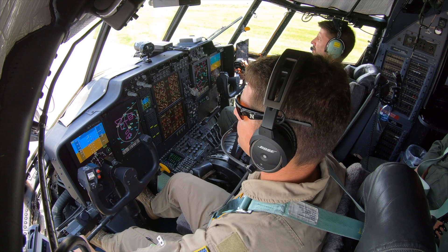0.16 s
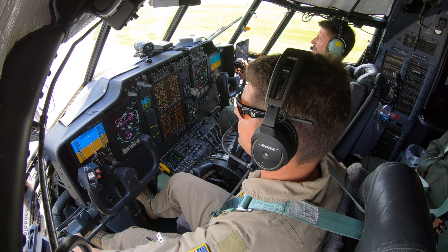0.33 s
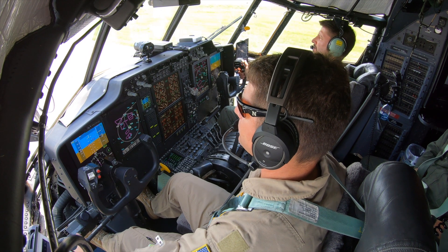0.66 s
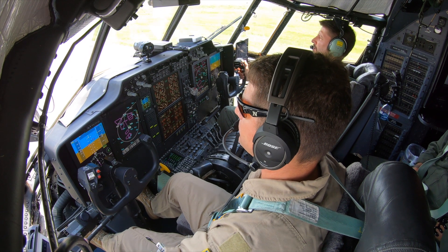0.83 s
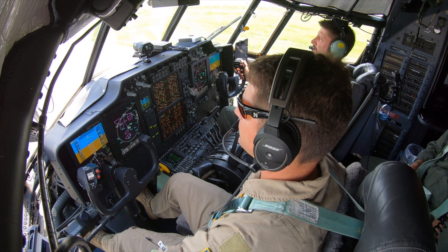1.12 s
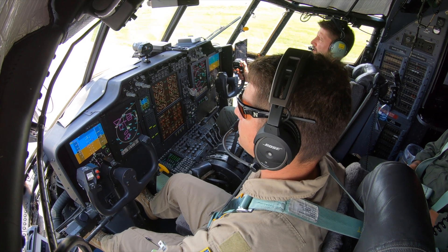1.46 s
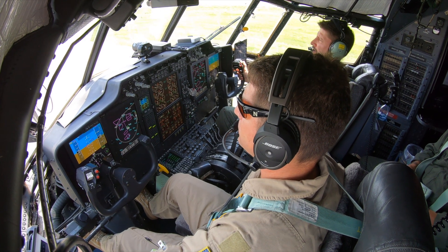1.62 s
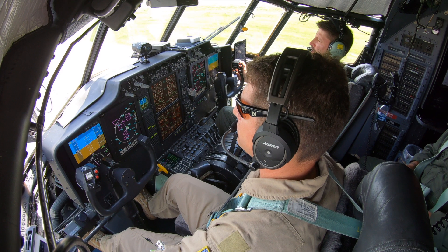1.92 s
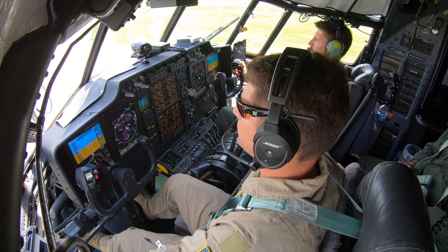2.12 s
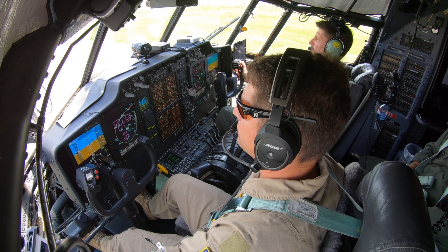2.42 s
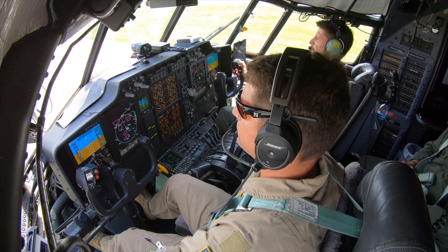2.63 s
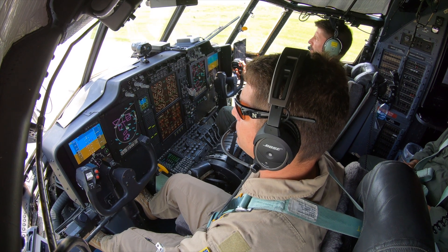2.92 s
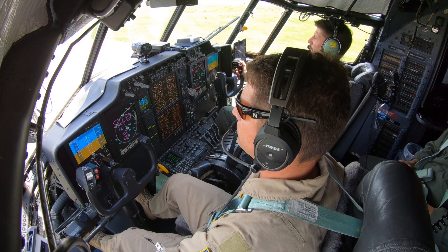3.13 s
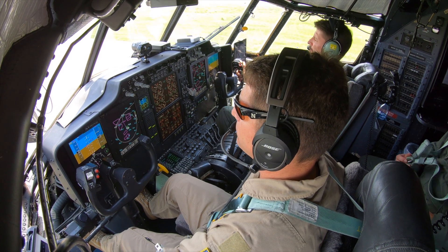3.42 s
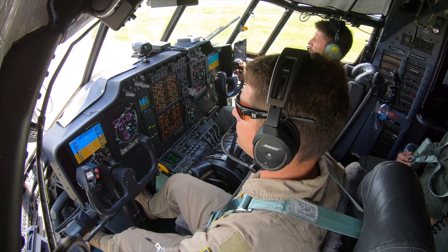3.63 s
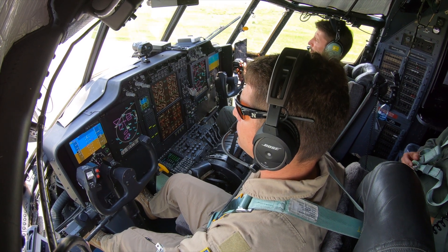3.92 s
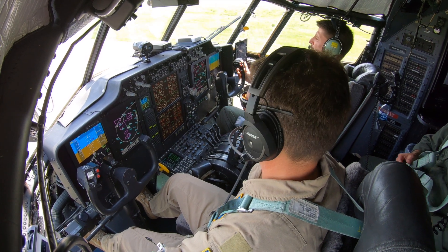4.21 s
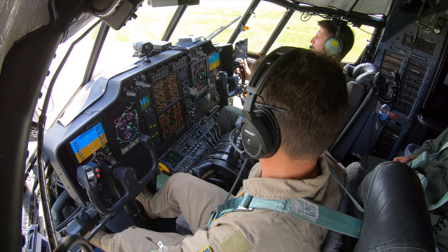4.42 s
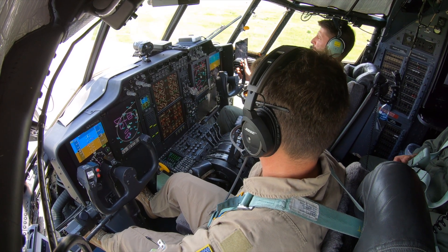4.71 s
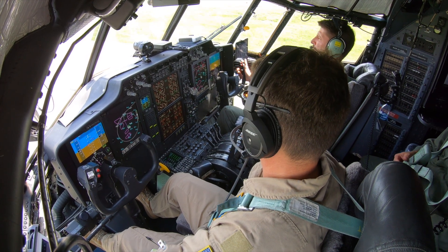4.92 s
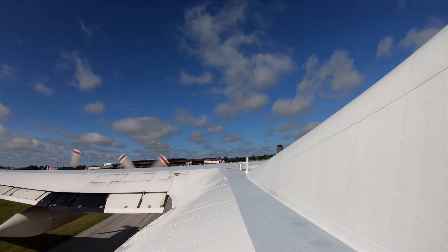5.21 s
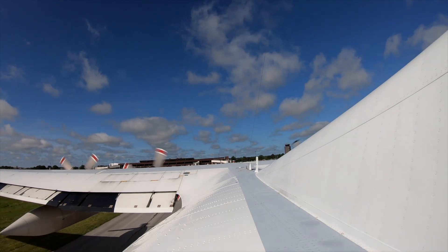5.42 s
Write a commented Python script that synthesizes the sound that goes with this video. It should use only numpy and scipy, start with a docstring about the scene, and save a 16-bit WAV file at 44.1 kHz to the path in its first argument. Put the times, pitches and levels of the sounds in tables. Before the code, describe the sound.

A continuous loud cockpit drone: two propeller hums beating slowly against each other, dense low rumble with uneven flutter, ventilation-like hiss and several thin wavering whines, the highest leaning right. The low end is nearly mono, the hiss wider. In the last fraction of a second, a hard cut moves outdoors to broad windy propeller wash with little whine.

```python
"""Turboprop engines idle on the ground, heard in the cockpit: two propeller hums of drifting phase beat
slowly, and delayed copies of turbulent noise add up to a ribbed roar. Smooth noise makes the air hiss and
wavering harmonic series make the gear whine; loud peaks duck all of them.
At 5.25 s, near the end, the listening point jumps outside, above the wing, to a thinner and wider rush of
air: ribbed noise and faint low hums."""
import sys
import numpy as np
from scipy import signal
from scipy.fft import rfft, irfft
from scipy.io import wavfile

SR = 44100
rng = np.random.default_rng(int(sys.argv[2]) if len(sys.argv) > 2 else 0)


def store_pcm(level_fs):
    """Save levels as 16-bit WAV."""
    pcm = np.round(np.clip(level_fs, -1, 1) * 32767).astype(np.int16)
    wavfile.write(sys.argv[1], SR, np.atleast_2d(pcm).T)


N = 244755
TIME = np.arange(N) / SR  # s
HZ = np.maximum(np.arange(N // 2 + 1) * SR / N, 1)  # frequency of each spectral bin, kept above zero

# Phase slip of the farther propeller behind the nearer; the hums oppose at .5, 1.5, 2.5 turns.
# Columns: time_s, slip_turns
PROPELLER_SLIP = [(0, .24), (.3, .28), (.45, .23), (.55, .34), (.65, .5), (.75, .7), (.85, .62), (.92, .7),
                  (1.02, .68), (1.3, .95), (1.45, 1.17), (1.85, 1.23), (2.15, 1.5), (2.21, 1.34),
                  (2.3, 1.3), (2.4, 1.45), (2.56, 1.5), (2.75, 1.9), (2.9, 1.61), (3.05, 1.9), (3.25, 1.7),
                  (3.4, 1.97), (3.52, 2.27), (3.65, 2.18), (4.0, 2.29), (4.2, 2.29), (4.3, 2.47),
                  (4.45, 2.65), (4.53, 2.57), (4.85, 2.74), (5.05, 2.73), (5.17, 2.93)]
# Multiples of the blade rate that sound as tones, from the second up. Column: pitch_hz
RIB_TONE_HZ = [126.5, 187.4, 253.3, 317.3, 382, 443, 505]
# One row for each of those pitches; the rise applies where the hums oppose, its reverse where they agree.
# Columns: base_level_db, blur_hz, rise_db
RIB_TONE_LEVELS = [(-29.5, 6.4, 7), (-26, 3.84, 3), (-27.5, 6, 0.5), (-26.5, 5.13, 1), (-38, 4.5, -0.5),
                   (-40.5, 6.1, -7.5), (-38, 4.4, -1)]
# Strongest surges of the rib tones. Columns: centre_s, blade_rate_multiple, rise_db
RIB_SURGES = [(.3, 3, 4), (.62, 2, 5), (.7, 5, 3), (.81, 4, 6), (.88, 2, 5), (1.1, 5, 3), (1.42, 4, 6),
              (1.56, 5, 3), (2.1, 2, 4), (2.17, 4, 5), (2.25, 8, 7), (2.43, 5, 6), (2.65, 3, 6),
              (2.73, 7, 8), (2.9, 3, 5), (3.18, 3, 4), (3.2, 5, 5), (3.38, 7, 7), (3.55, 8, 8),
              (3.57, 4, 4), (3.85, 4, 4), (3.85, 5, 4), (3.92, 3, 5), (3.95, 6, 5), (4.18, 2, 4),
              (4.23, 7, 5), (4.27, 4, 4), (4.38, 2, 4), (4.41, 5, 4), (4.5, 3, 5), (4.7, 5, 4),
              (4.97, 4, 5), (5.02, 2, 4), (5.09, 7, 5), (5.09, 8, 7), (5.1, 3, 4), (5.21, 5, 6)]
HUM_HZ = 65.2  # midway between the two propellers' blade-passing hums
NEAR_DB, FAR_DB = -18.5, -20.5
HUM_WAVER_DB, HUM_WAVER_RADIANS = .6, .15
SURGE_S = .066  # half length of a surge


def blade_tones():
    """Beating: two hums of drifting phase add and oppose, and unsteady inflow modulates their multiples."""
    turn = rng.uniform(0, 2 * np.pi) + 2 * np.pi * HUM_HZ * TIME
    slip = 2 * np.pi * np.interp(TIME, *np.transpose(PROPELLER_SLIP))
    behind = slip + HUM_WAVER_RADIANS * drift(4.3)
    near = from_db(NEAR_DB + HUM_WAVER_DB * drift(6.3)) * np.sin(turn + behind / 2)
    far = from_db(FAR_DB + HUM_WAVER_DB * drift(3.9)) * np.sin(turn - behind / 2)
    tones = np.sqrt(2) * (near + far)
    rows = zip(RIB_TONE_HZ, RIB_TONE_LEVELS)
    for multiple, (pitch_hz, (level_db, blur_hz, rise_db)) in enumerate(rows, 2):
        surge_db = 0
        for centre_s, surging_multiple, peak_db in RIB_SURGES:
            if surging_multiple == multiple:
                surge_db = surge_db + peak_db * np.exp(-.5 * ((TIME - centre_s) / SURGE_S) ** 2)
        gain = from_db(level_db + surge_db - rise_db * np.cos(behind))
        tones = tones + gain * lumpy_tone(pitch_hz, blur_hz)
    return tones


# Spectrum of the roar before its ribs and the cabin colour it; only the shape counts.
# Columns: frequency_hz, relative_density_db
ROAR_SPECTRUM = [(18, -14), (28, -7), (38, -13), (50, -4), (65, -11.5), (88, -6), (100, -3.5), (145, -4.5),
                 (215, -2.5), (280, -2), (335, -3), (370, -8), (450, -6), (600, -18), (1100, -31),
                 (5000, -103)]
ROAR_DB, ROAR_RIB_SHARE = -15, .24


def propeller_roar():
    """Repeated chopping: eddies cut by blade after blade give a ribbed roar through the cockpit walls."""
    colour = blade_ribs(ROAR_RIB_SHARE) * from_db(over_hz(ROAR_SPECTRUM))
    return from_db(ROAR_DB) * cabin_noise(colour)


# Spectrum of the hiss before the cabin colours it; only the shape counts.
# Columns: frequency_hz, relative_density_db
HISS_SPECTRUM = [(500, -20), (900, 4.5), (1400, -1.5), (2000, -4.5), (3200, -7), (4600, -8), (6000, -8.5),
                 (7200, -6), (8300, -13.5), (10200, -14.5), (11800, -22.5), (13800, -29.5), (15000, -40),
                 (15300, -52)]
HISS_DB = -31.5


def air_hiss():
    """Broadband flow noise: intake and ventilation air hisses smoothly and flutters a little."""
    flutter_db = .5 * drift(2.7) + .5 * drift(35.0)
    return from_db(HISS_DB + flutter_db) * cabin_noise(from_db(over_hz(HISS_SPECTRUM)))


# Fundamental of each gear mesh. Column: pitch_hz
MESH_HZ = [1614.8, 1663.45, 1686.0, 1368.9, 1386.1, 7553.0, 7267.0, 5394.0, 13885.0]
# One row for each mesh; pitch waver is that of the fundamental.
# Columns: pitch_waver_hz, level_waver_db, list of (multiple, left_level_db, right_level_db)
GEAR_MESHES = [(.2, 2.5, [(1, -54, -59), (2, -57, -56), (3, -58, -55), (4, -55, -51), (5, -64, -64),
               (6, -76, -66), (8, -78, -77)]), (.2, 1.5, [(2, -66, -64), (3, -53, -54), (4, -60, -40),
               (5, -72, -73), (6, -74, -67), (7, -83, -74)]), (.2, 1.5, [(1, -58, -53), (2, -55, -56),
               (3, -53, -54), (4, -61, -48), (5, -61, -54), (6, -70, -60), (7, -84, -75)]),
               (1.4, 1.8, [(1, -42.5, -41.5), (2, -58, -57)]), (1.0, 2.0, [(1, -45, -48), (2, -58, -63),
               (4, -61, -55)]), (4.0, 2.5, [(1, -55, -43.5)]), (3.0, 3.0, [(1, -73, -55)]),
               (3.0, 3.0, [(1, -62, -60)]), (2.0, 3.0, [(1, -86, -77)])]
# The strongest gear tones. Column: pitch_hz
WHINE_HZ = [1369, 1386, 4844, 5058, 6459, 6654, 6744, 7553]
# Their slow swells; only the swing about the mean counts.
# Columns: time_s, then level_db for each of those pitches
WHINE_SWELLS = [(.3, -41.5, -48.5, -59.5, -58.5, -49.5, -45.5, -53, -52),
                (.9, -43, -46.5, -57, -58, -53, -45.5, -52.5, -60),
                (1.5, -43.5, -48.5, -56, -55, -53, -45, -56.5, -54.5),
                (2.1, -44, -49, -53.5, -52.5, -56, -45, -56.5, -50.5),
                (2.7, -47, -48.5, -56, -51, -56.5, -47, -55.5, -47.5),
                (3.3, -43.5, -47, -57.5, -53.5, -56, -46.5, -55, -51),
                (3.9, -43, -47, -60, -53, -55.5, -47.5, -53.5, -57),
                (4.5, -42.5, -46, -57.5, -54, -59.5, -47, -52, -65),
                (5.0, -42, -48, -58, -53, -57, -46, -55, -60)]


def gear_whine():
    """Harmonic series: each mesh sings on multiples of one wavering rate, and the strongest swell slowly."""
    whine, lead = np.zeros((2, N)), over_hz(CABIN_LEAD)
    swell_times, *swell_levels = np.transpose(WHINE_SWELLS)
    for mesh_hz, (pitch_waver_hz, level_waver_db, multiples) in zip(MESH_HZ, GEAR_MESHES):
        turn = 2 * np.pi * np.cumsum(mesh_hz + pitch_waver_hz * drift(3.56)) / SR
        for multiple, *sides_db in multiples:
            tone_hz = multiple * mesh_hz
            right_lag = np.c_[[0, lead[int(tone_hz * N / SR)]]]
            phase = multiple * turn + rng.uniform(0, 2 * np.pi) - right_lag
            swell_db = .5 * level_waver_db * drift(.54)
            for strong_hz, levels_db in zip(WHINE_HZ, swell_levels):
                if abs(strong_hz - tone_hz) < 2:
                    swell = from_db(np.interp(TIME, swell_times, levels_db))
                    swell_db = 20 * np.log10(rms_one(swell))
            level_db = np.c_[sides_db] + swell_db + .7 * level_waver_db * drift(11.0)
            whine += np.sqrt(2) * from_db(level_db) * np.sin(phase)
    return whine


# Spectrum of the outside wash before its ribs; only the shape counts.
# Columns: frequency_hz, relative_density_db
OUTSIDE_SPECTRUM = [(20, -1), (45, 6.5), (85, -3), (120, 1), (180, -4.5), (330, -6), (550, -7),
                    (1040, -12.5), (1500, -17.5), (2200, -23), (3700, -30.5), (5300, -31.5), (5900, -24.5),
                    (6700, -26), (7600, -30), (9000, -32.5), (11700, -42), (13500, -52), (15400, -68)]
# Part of the right channel not shared with the left, capped at 0 dB. Columns: frequency_hz, unshared_db
OUTSIDE_UNSHARED = [(60, 0.5), (180, 0.5), (550, -1.2), (1650, 1.5), (4000, -3), (9000, 4)]
# Stereo balance of the wash. Columns: frequency_hz, left_minus_right_db
OUTSIDE_BALANCE = [(60, 0), (700, 1.5), (1300, -7), (2400, -3.5), (4400, -3), (6200, -14.5), (7400, -12),
                   (8800, 0), (12000, -7)]
# Separate swells of the rumble and of the rush above it. Columns: time_s, rumble_db, rush_db
WASH_SWELLS = [(5.25, -2, -2), (5.35, -2, -2), (5.43, -2, -1.5), (5.5, -3.5, -2), (5.55, -6, -2)]
# Faint low hums of the propeller wash. Columns: pitch_hz, left_level_db, right_level_db
OUTSIDE_HUMS = [(53.2, -36, -33), (105, -36, -39), (129, -36, -35), (180, -35, -34), (240, -34.5, -38),
                (301, -39, -37)]
OUTSIDE_DB, OUTSIDE_RIB_SHARE = -18, .085
WASH_SPLIT_HZ = 600


def outside_rush():
    """Weakly coherent flow noise: wide wash above the wing, its rumble sinking below the rush."""
    colour = blade_ribs(OUTSIDE_RIB_SHARE) * from_db(over_hz(OUTSIDE_SPECTRUM))
    wash = stereo_noise(colour, OUTSIDE_UNSHARED, OUTSIDE_BALANCE, 0)
    rumble = irfft(rfft(wash) / (1 + (HZ / WASH_SPLIT_HZ) ** 2), N)
    rush = wash - rumble
    times, rumble_db, rush_db = np.transpose(WASH_SWELLS)
    rumble_gain = from_db(np.interp(TIME, times, rumble_db))
    rush_gain = from_db(np.interp(TIME, times, rush_db))
    flutter_db = .5 * drift(4.9) + .55 * drift(30.0)
    out = from_db(OUTSIDE_DB + flutter_db) * (rumble_gain * rumble + rush_gain * rush)
    for pitch_hz, *sides_db in OUTSIDE_HUMS:
        out = out + from_db(np.c_[sides_db]) * lumpy_tone(pitch_hz, 3.3)
    return out


RIB_HZ = 63.2  # rate at which blades cut the same eddy
RIB_BLUR_HZ = 900  # here the returning share has halved, so the ribs blur above


def blade_ribs(share):
    """Comb filtering: turbulence repeated at the blade rate piles up in broad ribs on its multiples."""
    share = np.clip(share, 0, .9) / (1 + (HZ / RIB_BLUR_HZ) ** 2)
    return np.sqrt(1 - share ** 2) / (1 - share * np.exp(-2j * np.pi * HZ / RIB_HZ))


RIB_STEADY = .62  # amplitude share of each tone that holds still


def lumpy_tone(hz, blur_hz):
    """Random modulation: part of a tone swells, dies and turns by chance; rms near 1."""
    unsteady = drift(blur_hz) + 1j * drift(blur_hz)
    lumps = RIB_STEADY + np.sqrt((1 - RIB_STEADY ** 2) / 2) * unsteady
    turn = 2 * np.pi * np.cumsum(hz + blur_hz / 2 * drift(blur_hz)) / SR
    return np.sqrt(2) * np.real(lumps * np.exp(1j * turn))


# Cabin and microphone-housing resonances; negative lifts are dips.
# Columns: frequency_hz, width_hz, left_lift_db, right_lift_db
CABIN_RESONANCES = [(148, 18, 4, 4), (168, 10, -2, -2), (212, 14, -2, -2), (340, 14, 2, 2), (545, 40, 2, 2),
                    (600, 30, 2, 2), (715, 50, -4, 0), (775, 70, 5, 3), (815, 50, 0, 3), (885, 80, 3, 0),
                    (990, 130, -3, 0), (1150, 30, 3, 3), (1223, 40, 7, 7), (1300, 110, 8, 5),
                    (1650, 70, 7, 7), (1900, 50, 2, 2), (2010, 80, 1, 2), (2234, 60, 3, 4),
                    (2360, 130, -2, -1), (2540, 110, -2, -2), (2740, 60, 3, 3), (2810, 60, -5, -4),
                    (2930, 130, 4, 3), (3110, 70, 3, 2), (3280, 70, -4, -4), (3650, 200, 3, 2),
                    (3900, 140, -3, -4), (4100, 200, 2, 1), (4350, 120, -2, -2), (5500, 350, 3, 3),
                    (5900, 400, -2, -2), (7350, 480, 4, 3)]
# Part of the right microphone's noise not shared with the left, capped at 0 dB.
# Columns: frequency_hz, unshared_db
CABIN_UNSHARED = [(30, -26), (60, -28), (120, -12.5), (270, -40), (450, -20), (600, -4.5), (800, -2),
                  (1220, -3), (2000, -0.5), (3300, -5), (5500, -0.5), (9000, 1)]
# Stereo balance apart from the resonances. Columns: frequency_hz, left_minus_right_db
CABIN_BALANCE = [(200, .2), (450, 1), (2000, -.5), (4500, -1), (5500, -4), (6000, -7), (6500, -12),
                 (7000, -13), (7600, -10), (8400, -4), (9500, -3), (10500, -6), (14000, -4)]
# Phase by which the left microphone leads. Columns: frequency_hz, left_lead_radians
CABIN_LEAD = [(200, 0), (780, -.5), (2760, -.3), (3360, .4), (5000, -.1), (6460, 1.0), (7410, 1.6)]


def cabin_noise(colour):
    """Resonance: the cabin lifts and dips bands of noise on its way to the two microphones."""
    lift_db = 0
    for hz, width_hz, *sides_db in CABIN_RESONANCES:
        hump = np.exp(-.5 * ((HZ - hz) / (width_hz / 2)) ** 2)
        lift_db = lift_db + np.outer(sides_db, hump)
    return stereo_noise(colour * from_db(lift_db), CABIN_UNSHARED, CABIN_BALANCE, over_hz(CABIN_LEAD))


def stereo_noise(colour, unshared, balance, lead):
    """Partial coherence: two coloured noises share a part at each frequency; joint rms 1."""
    shared, own = rfft(rng.standard_normal((2, N)))
    apart = from_db(np.minimum(over_hz(unshared), 0))
    tilt_db = over_hz(balance) / 2
    left = shared * from_db(tilt_db)
    lagging = np.sqrt(1 - apart ** 2) * shared * np.exp(-1j * lead)
    right = (lagging + apart * own) * from_db(-tilt_db)
    return rms_one(irfft(colour * np.array([left, right]), N))


LIMIT_DB, SQUEEZE = -6, .38  # ducking threshold, and dB of ducking for each dB above it
RELEASE_DB_PER_S, ATTACK_S = 90, .00031  # fall of the held peak, smoothing time of the ducking


def gain_control(x):
    """Dynamic compression: the cockpit microphone ducks both channels on loud peaks, recovering slowly."""
    peak_db = 20 * np.log10(np.abs(x).max(axis=0) + 1e-9)
    fall_db = RELEASE_DB_PER_S * TIME
    held_db = np.maximum.accumulate(peak_db + fall_db) - fall_db
    r = np.exp(-1 / (ATTACK_S * SR))
    duck_db = SQUEEZE * np.maximum(held_db - LIMIT_DB, 0)
    return x * from_db(-signal.lfilter([1 - r], [1, -r], duck_db))


def from_db(db):
    """Logarithmic level: decibels to amplitude gain."""
    return 10 ** (np.asarray(db) / 20)


def rms_one(x):
    """Normalisation: scale to unit rms."""
    return x / np.sqrt(np.mean(x ** 2) + 1e-20)


def over_hz(points):
    """Logarithmic pitch: a (frequency_hz, value) table read at every bin, straight on a log axis."""
    hz, value = np.transpose(points)
    return np.interp(np.log(HZ), np.log(hz), value)


def drift(rate_hz):
    """Low-passed chance: noise at every 40th sample through two equal one-pole filters; spread near 1."""
    r = np.exp(-80 * np.pi * rate_hz / SR)
    noise = rng.standard_normal(N // 40 + 2002)
    slow = signal.lfilter([1], [1, -2 * r, r * r], noise)[2000:]  # drop the filter's start
    return np.interp(np.arange(N) / 40, np.arange(len(slow)), rms_one(slow - slow.mean()))


FADE_FROM_S, JUMP_S, FADE_IN_S = 5.238, 5.250, .002


def scene():
    """Superposition and crossfade: the cockpit fades in milliseconds as the outside sound takes over."""
    cockpit = blade_tones() + propeller_roar() + air_hiss() + gear_whine()
    fade_out = np.clip((JUMP_S - TIME) / (JUMP_S - FADE_FROM_S), 0, 1)
    fade_in = np.clip(1 + (TIME - JUMP_S) / FADE_IN_S, 0, 1)
    return fade_out * gain_control(cockpit) + fade_in * outside_rush()


CEILING, CUTOFF_HZ = 2.1, 15600  # amplitude that peaks round off towards; top of the band


def record(dry):
    """Saturation and band limiting: peaks are rounded, then a steep low-pass cuts the top."""
    steep = signal.ellip(10, .5, 60, CUTOFF_HZ, fs=SR, output="sos")
    return signal.sosfilt(steep, CEILING * np.tanh(dry / CEILING))


dry = scene()
out = record(dry)
store_pcm(out)
```